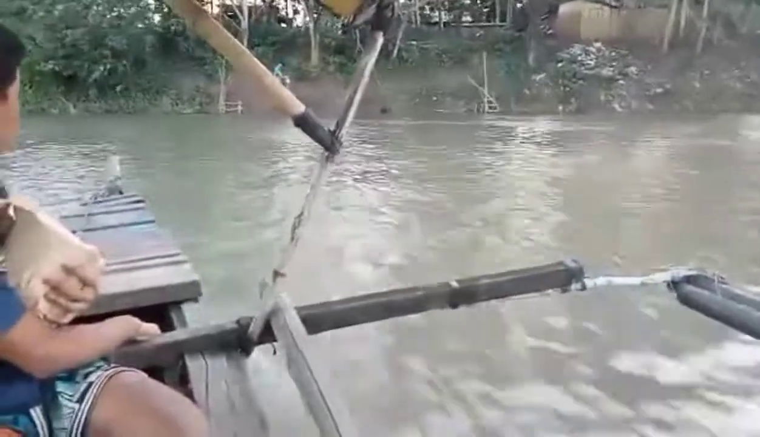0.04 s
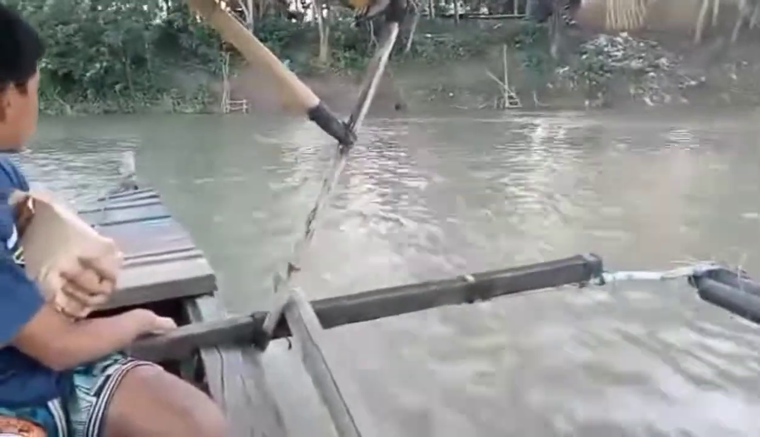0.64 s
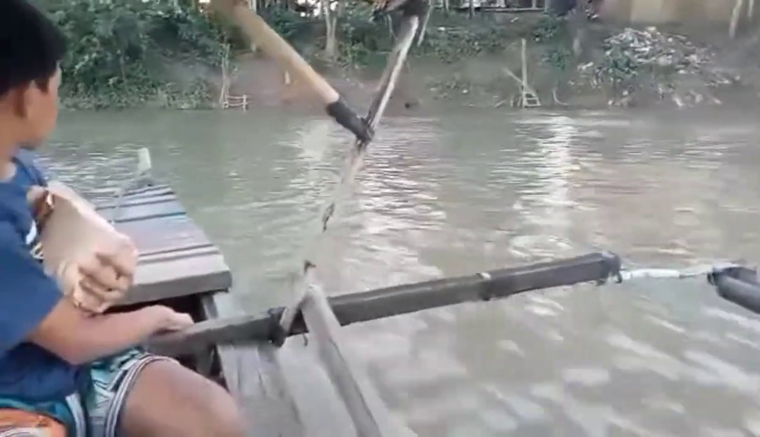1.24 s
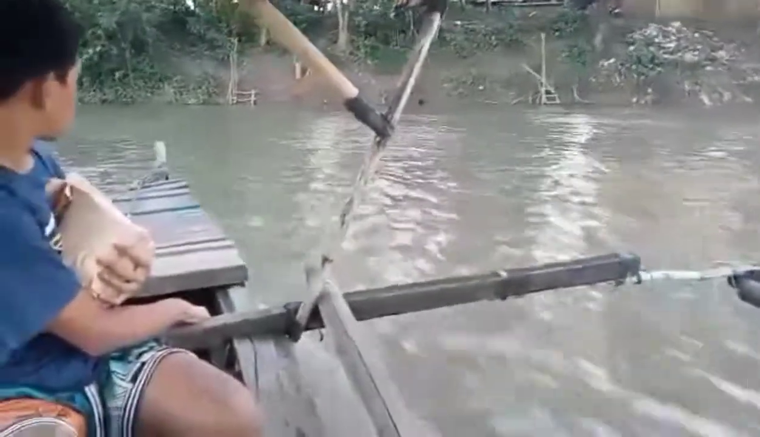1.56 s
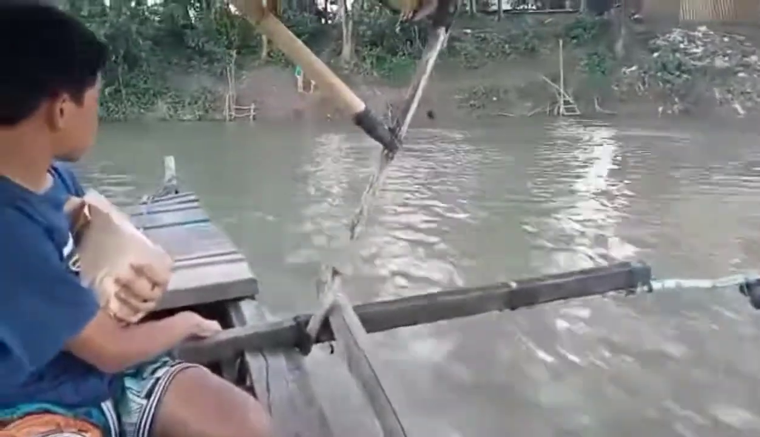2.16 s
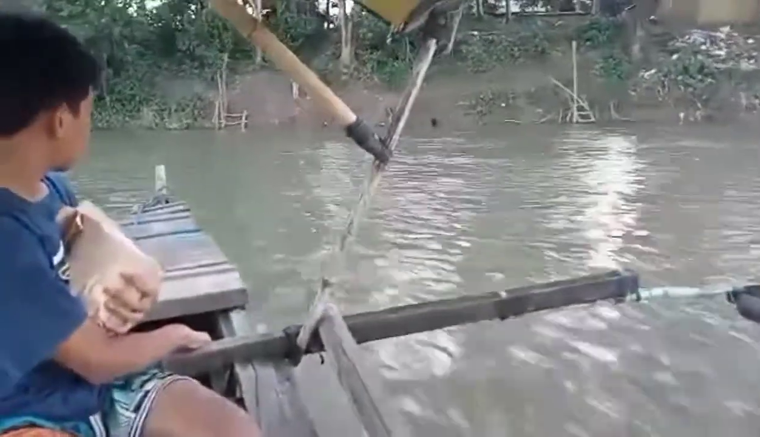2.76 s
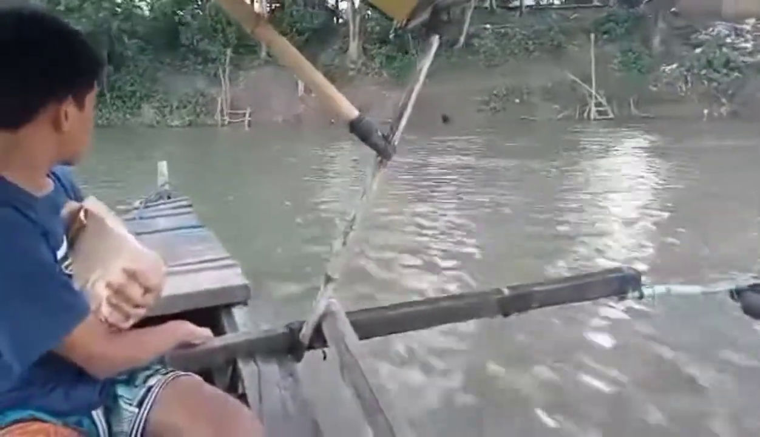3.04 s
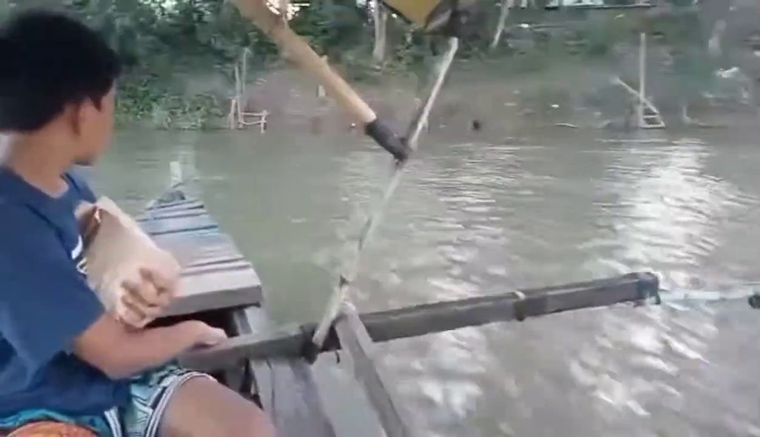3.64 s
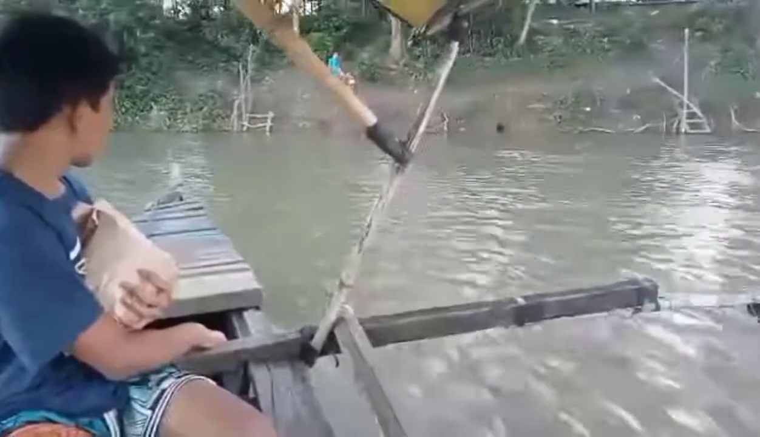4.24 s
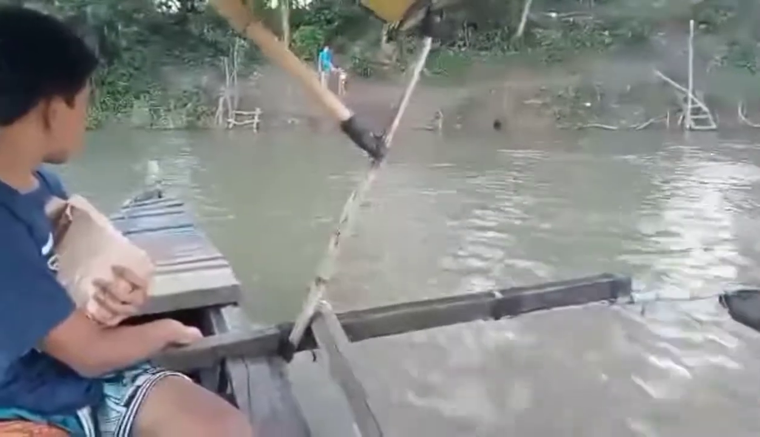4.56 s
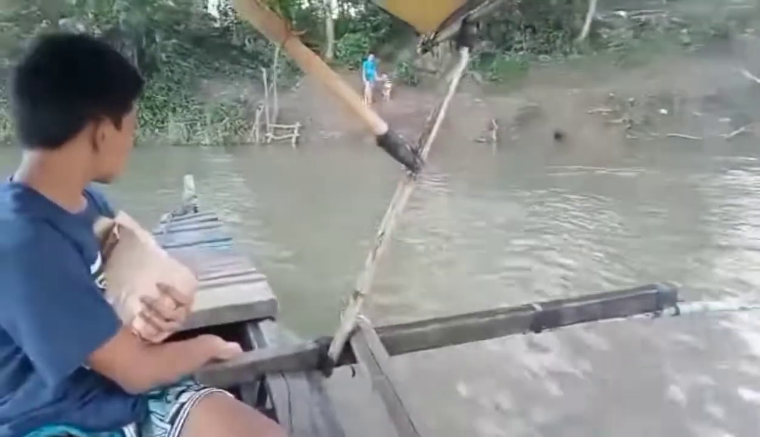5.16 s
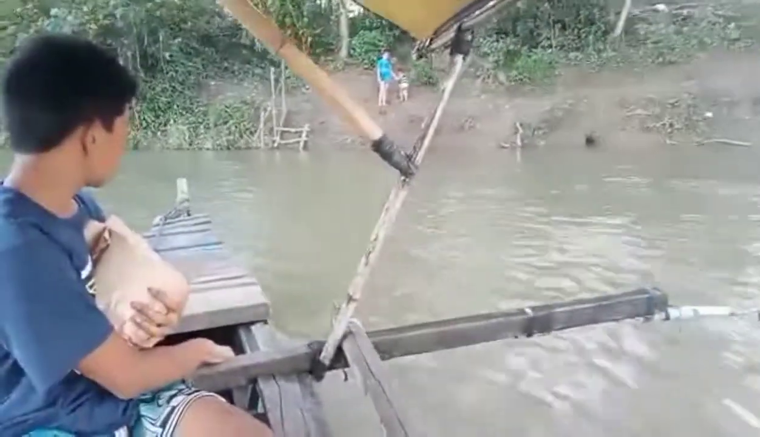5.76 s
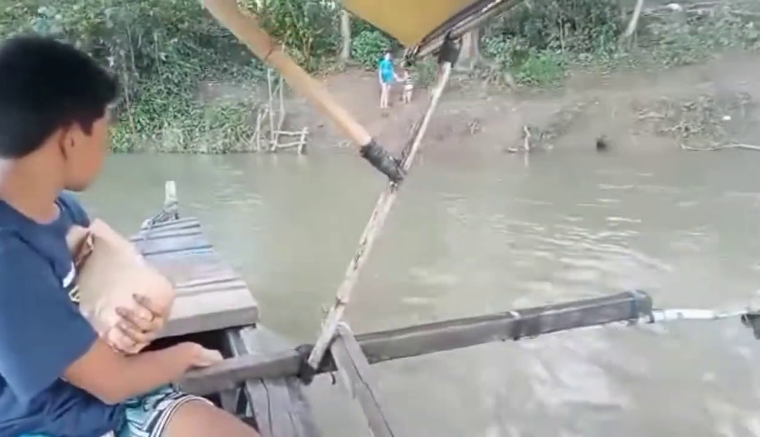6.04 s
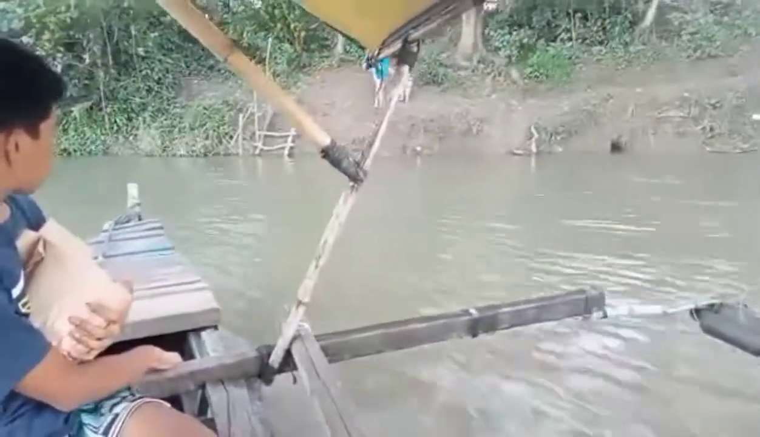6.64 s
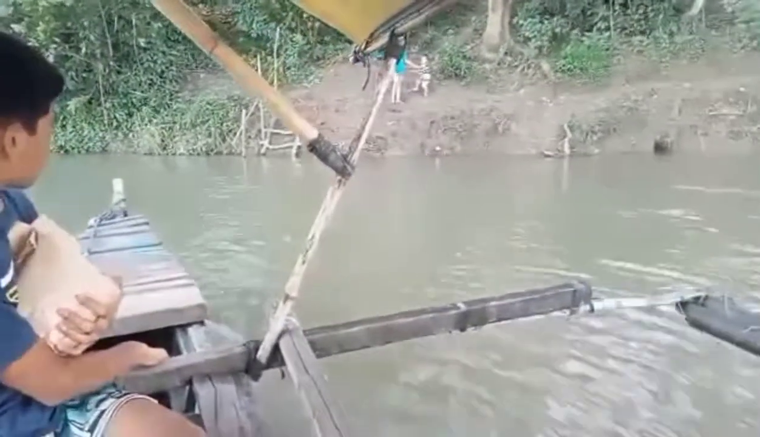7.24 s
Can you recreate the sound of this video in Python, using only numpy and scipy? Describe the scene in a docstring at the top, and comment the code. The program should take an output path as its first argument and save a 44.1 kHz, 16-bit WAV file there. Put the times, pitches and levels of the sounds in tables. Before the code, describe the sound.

From the start, a small one-cylinder engine putters rapidly, heard close from a seat in a wooden river boat. Each firing gives a low thump, a hissy spit and a gulp of air, over ticking valves, rattling loose parts and a hum in the hull. Water washes and laps along the boat throughout, beneath the engine. Near 1 second the engine slows and skips firings, then recovers by 2 seconds and runs evenly. From 3 seconds it sags again, sputtering with gaps and reaching a slow, stumbling beat at about 5.7 seconds, while the propeller shaft scrapes faintly. Around 6 seconds it picks up quickly. At about 6.6 seconds it stops firing and runs down, with softer, slowing thumps, air gulps, ticks and a light scrape until the end at about 7.5 seconds.

```python
"""A small one-cylinder four-stroke engine putters in a wooden river boat, heard from a seat on board.
From the start, water washes along the hull, turning parts hum and the valve gear clatters. At each
firing the exhaust spits and thumps, then the intake gulps air. On a low throttle the speed wavers:
near 1 s the engine skips firings, by 2 s it recovers, and from 3 s it sags and skips again.
It picks up around 6 s, then stops firing and runs down."""
import sys
import numpy as np
from scipy import signal
from scipy.fft import rfft, irfft
from scipy.io import wavfile
from scipy.ndimage import uniform_filter1d, minimum_filter1d

SR = 44100
rng = np.random.default_rng(int(sys.argv[2]) if len(sys.argv) > 2 else 0)


def log_audio(samples):
    """Write samples as a 16-bit WAV file to the path given in sys.argv[1]."""
    # one column per channel
    frames = np.atleast_2d(samples).T
    # limit to full scale, then quantise
    limited = np.clip(frames, -1, 1)
    pcm = np.round(limited * 32767).astype(np.int16)
    wavfile.write(sys.argv[1], SR, pcm)


N = 330309
CLOCK = np.arange(N) / SR
AGE = np.arange(SR // 6) / SR  # seconds since a blow


def undb(db):
    """Turn decibels into a number to multiply by."""
    return 10 ** (np.asarray(db) / 20)


def unit(x):
    """Scale a sound to an average strength (rms) of 1."""
    return x / np.sqrt(np.mean(x ** 2))


def burst(x):
    """Scale a blow to an average strength of 1 over its first 20 ms."""
    return x / np.sqrt(np.mean(x[:SR // 50] ** 2))


def add(track, s, x):
    """Mix x into the track at s seconds."""
    i = int(np.clip(s * SR, 0, N - 1))
    track[i:i + len(x)] += x[:N - i]


def follow(table, times):
    """Read each level column at the given times, sliding between rows."""
    s, *columns = np.transpose(table)
    return [np.interp(times, s, column) for column in columns]


def high_pass(x, hz, order):
    """Take out what lies below hz."""
    return signal.sosfilt(signal.butter(order, hz, "high", fs=SR, output="sos"), x)


def noise(points, size=N):
    """Noise whose tone colour follows rows of f/Hz, level/dB."""
    hz, db = np.transpose(points)
    f = np.arange(size // 2 + 1) * SR / size
    gain = undb(np.interp(np.log(f + 1), np.log(hz), db))
    return unit(irfft(rfft(rng.standard_normal(size)) * gain, size))


def wander(hz, size=N):
    """A smooth random wobble that takes a new course hz times a second."""
    step = max(int(SR / hz), 1)
    stairs = np.repeat(rng.standard_normal(size // step + 1), step)
    return unit(uniform_filter1d(stairs, step)[:size])


def ring(notes, rise_s, detune, scatter_db, swell=1):
    """Notes ring after a push and drop 60 dB in their fade time; more swell gives a gentler start."""
    hz, db, fade_s = np.transpose(notes)[:, :, None]
    pitch, size = rng.standard_normal((2, len(notes), 1))
    fade = np.exp(-np.log(1000) * AGE / fade_s)
    waves = undb(db + scatter_db * size) * fade * np.sin(2 * np.pi * hz * (1 + detune * pitch) * AGE)
    return burst(waves.sum(0) * (1 - np.exp(-(AGE / rise_s) ** swell)))


def puff(rise_s, hold_s, fade_s):
    """The flow of gas through a valve: it opens, blows and dies away."""
    fade = np.exp(-np.log(1000) * np.maximum(AGE - hold_s, 0) / fade_s)
    return burst((1 - np.exp(-AGE / rise_s)) * fade)


# tone colour of the wash: f/Hz, level/dB
WASH = [(25, -4), (50, -23), (85, 7), (200, 7), (500, -6), (1200, -11), (2500, -16), (5000, -18.5),
        (12000, -58)]
def water():
    """Water along the hull swells slowly and laps quickly."""
    return undb(-39.5) * noise(WASH) * undb(wander(hz=2.05) + 5 * wander(hz=19))


FULL_RPM, FIRST_FIRING_S, IGNITION_OFF_S = 2124, .048, 6.58
# how fast the engine turns: t/s, speed/rpm
ENGINE_SPEED = [(0.0, 2095), (0.102, 2189), (0.584, 2064), (1.032, 1790), (1.199, 1607), (1.48, 1583),
                (1.703, 1679), (1.838, 1867), (2.119, 2128), (2.777, 2107), (3.061, 1936), (3.299, 1840),
                (3.57, 1715), (4.053, 1722), (4.264, 1609), (4.616, 1478), (4.646, 1576), (5.0, 1467),
                (5.199, 1332), (5.739, 1199), (5.91, 1600), (6.16, 1954), (6.481, 2048), (6.914, 1232),
                (7.49, 535)]
def engine_motion():
    """Count the cycles so far (two engine turns each), and give the speed as a share of full speed."""
    rpm = np.interp(CLOCK, *np.transpose(ENGINE_SPEED))
    cycles = np.cumsum(rpm / 120) / SR
    return cycles + 1 - np.interp(FIRST_FIRING_S, CLOCK, cycles), rpm / FULL_RPM


# tones of the turning parts: shakes per cycle, level/dB
HULL_TONES = [(10, 0), (12, -7), (13, -10), (19, -4.5), (29, -34), (42, -12)]
def hull_hum(cycles, speed):
    """Turning parts shake the wooden hull; the tones follow the speed and stand out when it is high."""
    tones = sum(undb(db + .4 * wander(hz=13)) * np.sin(2 * np.pi * round(shakes) * cycles)
                for shakes, db in HULL_TONES)
    return undb(-26.5) * speed ** 6 * tones


# notes of the engine's metal parts: f/Hz, level/dB, fade/s
METAL_NOTES = [(1250, 1.5, 0.2), (1400, 8, 0.18), (1920, 1, 0.052), (2050, 10, 0.039), (2820, -11, 0.15),
               (4460, 6, 0.046), (8300, 22, 0.017), (9200, 23.5, 0.024)]
def valve_ticks(starts, speed):
    """The valve gear strikes metal four times a cycle, a little unevenly."""
    ticks = np.zeros(N)
    for s, period in zip(starts, np.diff(starts)):
        for quarter in np.arange(4) / 4:
            late, size = rng.standard_normal(2)
            tick = ring(METAL_NOTES, rise_s=.0004, detune=.015, scatter_db=3)
            add(ticks, s + period * (quarter + .055 * late), undb(2 * size) * tick)
    return undb(-46) * speed ** 1.04 * ticks


# tone colour of the loose parts: f/Hz, level/dB
RATTLE = [(45, -25), (70, 2), (100, 10), (200, 15.5), (330, 10.5), (600, 8), (900, 2), (1600, -1),
          (2400, 0.5), (3500, -11), (6500, -24), (8000, -26), (9400, -8), (13000, -29)]
def loose_rattle(cycles, speed):
    """Loose parts rattle after each jolt, then settle."""
    shaking_db = 2.1 * wander(hz=160) + 2.4 * np.sin(2 * np.pi * cycles)
    return undb(-26.5) * speed ** 1.34 * noise(RATTLE) * undb(shaking_db)


# tone colour of the rubbing shaft: f/Hz, level/dB
SHAFT = [(900, -32), (1130, -4), (1200, 0), (1290, 6), (1380, -13), (2000, -4.5), (2600, -11), (3200, -20),
         (7900, -17), (8150, -30), (8400, -26), (9200, -8), (10500, -25)]
def shaft_scrape(level_db):
    """The propeller shaft scrapes unevenly as it turns."""
    return noise(SHAFT) * undb(level_db + 2.2 * wander(hz=25))


# how loud the moving parts are: t/s, tick and rattle level/dB, scrape level/dB
MACHINERY_LEVELS = [(0, 5.5, -50), (.7, 1.7, -59), (1.3, -0.5, -72), (2.2, 1.5, -64), (4.5, -0.5, -44.5),
                    (5.6, 1, -40), (6.2, 2.2, -72), (6.7, 4, -38), (7.49, 4, -42)]
def machinery(starts, cycles, speed):
    """Ticks, rattle and scrape together, slowly growing louder and softer."""
    clatter_db, scrape_db = follow(MACHINERY_LEVELS, CLOCK)
    clatter = valve_ticks(starts, speed) + loose_rattle(cycles, speed)
    return undb(clatter_db) * clatter + shaft_scrape(scrape_db)


def cycle_level(speed, full_db, slowing_db, scatter_db):
    """A level for each cycle: full_db at full speed, plus slowing_db at a standstill, plus chance."""
    return full_db + slowing_db * (1 - speed) + scatter_db * rng.standard_normal(len(speed))


# skipped, weak or extra hard firings, against a normal one: t/s, thump level/dB, gas level/dB
UNEVEN_FIRINGS = [(.86, -4.5, -3), (.92, -8, -24.5), (1.05, -13, -26), (1.19, -13, -27), (1.5, -10, -33),
                  (1.85, 2, 1.5), (1.91, 1, -2.5), (2.83, -2, -1.5), (2.94, 3.5, 3), (3.26, -5, -10),
                  (3.52, -16, -32), (3.67, -21, -24), (4.01, -7, -25), (4.15, -10, -27), (4.3, -18, -35),
                  (4.46, -2, -2.5), (4.77, -14, -18.5), (4.93, -16, -35), (5.09, -7, -42), (5.27, -5, -23),
                  (5.46, -7, -32), (5.65, -12, -33)]
# slow rise and fall in loudness: t/s, thump level/dB, gas level/dB, gulp level/dB
LEVEL_DRIFT = [(0, -3.5, -1.5, -0.5), (.4, 0.5, 3.3, 4.8), (.7, -1, 2.5, -6), (1.0, 1.2, 1.1, 2.2),
               (1.5, -.2, 2, 1.7), (2.1, -2.4, -0.4, 1.5), (2.5, -4, -3, -1), (3.0, -2.5, 1.4, 0),
               (3.9, 2.5, 0.6, 2.6), (4.3, -0.3, 1, 1), (5.15, 1.4, 0.4, 3.7), (5.7, -2, -.4, 2.5),
               (6.2, 0, -0.3, 3.5), (6.6, 1, -3.5, -1.5), (7.25, -2.5, -15.5, 4.5), (7.49, -7, -17, -16)]
def firings(cycles, speed):
    """When each cycle starts and how strong its sounds are, set by speed and how well the fuel burns."""
    starts = np.interp(np.arange(int(cycles[-1]) + 1), cycles, CLOCK)
    pace = np.interp(starts, CLOCK, speed)
    coasting = starts > IGNITION_OFF_S
    thump_change_db, gas_change_db = -7.0 * coasting, -14.0 * coasting
    for s, thump, gas in UNEVEN_FIRINGS:
        nearest = np.argmin(abs(starts - s))
        thump_change_db[nearest], gas_change_db[nearest] = thump, gas
    thump_drift, gas_drift, gulp_drift = follow(LEVEL_DRIFT, starts)
    gas_pace = pace ** 5.8  # the gas noise softens only near full speed
    unburnt = (1 - undb(gas_change_db)) ** 2  # the intake gulps harder after a skipped firing
    thump_db = cycle_level(pace, -13, slowing_db=-8, scatter_db=.62) + thump_drift + thump_change_db
    bark_db = cycle_level(gas_pace, -29, slowing_db=5.9, scatter_db=1) + gas_drift + gas_change_db
    sizzle_db = cycle_level(gas_pace, -25, slowing_db=7.63, scatter_db=2.7) + gas_drift + gas_change_db
    gulp_db = cycle_level(pace, -17.5, slowing_db=-19.5, scatter_db=1) + gulp_drift + 5 * unburnt
    return starts, thump_db, bark_db, sizzle_db, gulp_db


def whistle(hz, width_hz, detune):
    """Gas forced through a gap makes a breathy tone, at a slightly new pitch each time."""
    f = np.arange(len(AGE) // 2 + 1) * SR / len(AGE)
    centre_hz = hz * (1 + detune * rng.standard_normal())
    peak = 1 / (1 + (2 * (f - centre_hz) / width_hz) ** 2)
    return unit(irfft(rfft(rng.standard_normal(len(AGE))) * peak, len(AGE)))


# notes of the sheet metal round the exhaust outlet: f/Hz, width/Hz, level/dB
SHEET_NOTES = [(1230, 42, -19), (1610, 57, -6.5), (1845, 440, -7.5), (2158, 83, 1), (2670, 120, -4),
               (3030, 135, -5), (3406, 25, -3), (4354, 16, 0.5), (4844, 183, -5.5), (6490, 87, -5),
               (7180, 140, -6), (7570, 102, 2.5), (8700, 240, -22), (10100, 48, -19)]
def sheet_metal(jet, scatter_db):
    """The jet of gas rings the sheet metal; each firing brings out different notes."""
    hz, width_hz, db = np.transpose(SHEET_NOTES)[:, :, None]
    f = np.arange(len(jet) // 2 + 1) * SR / len(jet)
    drive = undb(db + scatter_db * rng.standard_normal(db.shape))
    ringing = np.sum(drive / (1 + 2j * (f - hz) / width_hz), axis=0)
    return irfft(rfft(jet) * (.5 + ringing), len(jet))


# tone colours of the jet's rough bark and its high sizzle: f/Hz, level/dB
JET_BARK = [(300, -10), (800, 5), (1400, -1.5), (2200, 0), (3100, 1.5), (3800, 2.5), (4800, 1), (5800, 3),
            (7200, -2), (9000, -56)]
JET_SIZZLE = [(4000, -58), (7000, -20.5), (8300, -3.5), (9250, -0.5), (10200, -4.5), (11500, -7.5),
              (13000, -16), (14500, -45)]
def exhaust_spit(starts, bark_levels, sizzle_levels):
    """Burnt gas spits out in a ragged jet that whistles at the gaps, differently at every firing."""
    out = np.zeros(N)
    for s, bark_db, sizzle_db in zip(starts, bark_levels, sizzle_levels):
        low_gain, high_gain = undb(4 * rng.standard_normal(2))
        low_whistles = sum(whistle(hz, width_hz=170, detune=.15) for hz in (2600, 4600, 6000))
        bark = noise(JET_BARK, len(AGE)) + undb(-11) * low_gain * low_whistles
        sizzle = noise(JET_SIZZLE, len(AGE))
        sizzle += undb(-3) * high_gain * whistle(hz=9350, width_hz=220, detune=.028)
        sizzle += undb(-8) * whistle(hz=10500, width_hz=250, detune=.09)
        jet = undb(bark_db + 6.5) * unit(bark) + undb(sizzle_db + 6) * unit(sizzle)
        jet *= puff(rise_s=.0011, hold_s=.012, fade_s=.092)
        jet *= undb(1.5 * wander(hz=500, size=len(AGE)))
        add(out, s, sheet_metal(jet, scatter_db=3))
    return out


# deep notes of the muffler: f/Hz, level/dB, fade/s
MUFFLER_NOTES = [(74.3, -11, 0.061), (91, -33, 0.21), (176, 17.5, 0.029), (231.9, -9.5, 0.093)]
def exhaust_thump(starts, levels, speed):
    """Each push of gas rings the muffler, a little higher when the engine runs fast and hot."""
    out = np.zeros(N)
    for s, db in zip(starts, levels):
        pitch = 1 + .11 * (np.interp(s, CLOCK, speed) - .8) + .0041 * min(db + 11, 0)
        notes = [(hz * pitch, note_db, fade_s) for hz, note_db, fade_s in MUFFLER_NOTES]
        thump = ring(notes, rise_s=.008, detune=.008, scatter_db=1.2, swell=3)
        add(out, s + .0016, -undb(db - .96) * thump)
    return out


# notes of the air intake pipe: f/Hz, level/dB, fade/s
PIPE_NOTES = [(222, -21.5, 0.37), (336, -9.5, 0.18), (390.2, 1.5, 0.052), (434.2, -1, 0.1), (540, 1, 0.048),
              (627.7, -6.5, 0.077), (663, -13, 0.12), (736, -50, 0.14)]
def intake_gulp(starts, levels, speed):
    """About a third of a cycle later a valve opens: the pipe rings, air rushes in, the spring pings."""
    air_colour = [(80, -29), (280, -8), (650, -10), (1000, -18), (2200, -22.5), (5000, -32)]
    spring_notes = [(4020, -2.7, .11), (8140, -.36, .14)]
    out = np.zeros(N)
    for s, db in zip(starts, levels):
        period = 120 / (FULL_RPM * np.interp(s, CLOCK, speed))
        pipe = ring(PIPE_NOTES, rise_s=.002, detune=.005, scatter_db=1.5)
        rush = undb(-10) * noise(air_colour, len(AGE)) * puff(rise_s=.002, hold_s=.009, fade_s=.12)
        ping = undb(-21) * ring(spring_notes, rise_s=.00047, detune=.0068, scatter_db=6)
        add(out, s + .0068 + .203 * period, undb(db - 3) * (pipe + rush + ping))
    return out


def scene():
    """Engine and water sit in the middle; only the engine's hiss spreads to the sides."""
    cycles, speed = engine_motion()
    starts, thump_db, bark_db, sizzle_db, gulp_db = firings(cycles, speed)
    engine = hull_hum(cycles, speed) + machinery(starts, cycles, speed)
    engine += exhaust_spit(starts, bark_db, sizzle_db)
    engine += exhaust_thump(starts, thump_db, speed) + intake_gulp(starts, gulp_db, speed)
    middle = water() + high_pass(engine, hz=56.5, order=2)
    fresh_noise = machinery(starts, cycles, speed) + exhaust_spit(starts, bark_db, sizzle_db)
    hiss = undb(-13) * high_pass(fresh_noise, hz=4900, order=10)
    return np.array([middle + hiss, middle - hiss])


def record(dry):
    """The loudest peaks are turned down for an instant, and the treble above 13 kHz is cut steeply."""
    safe_gain = np.minimum(1, .95 / (abs(dry).max(axis=0) + 1e-9))
    smooth_gain = uniform_filter1d(minimum_filter1d(safe_gain, size=45), size=45)
    treble_cut = signal.ellip(10, .2, 75, 13000, fs=SR, output="sos")
    return signal.sosfilt(treble_cut, smooth_gain * dry)


dry = scene()
out = record(dry)
log_audio(out)
```